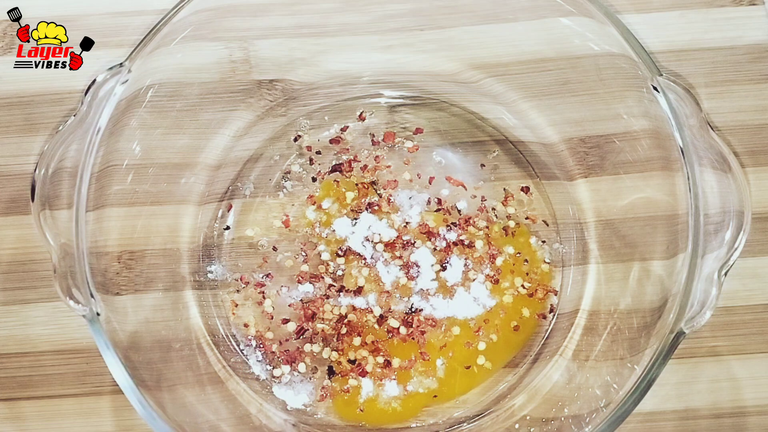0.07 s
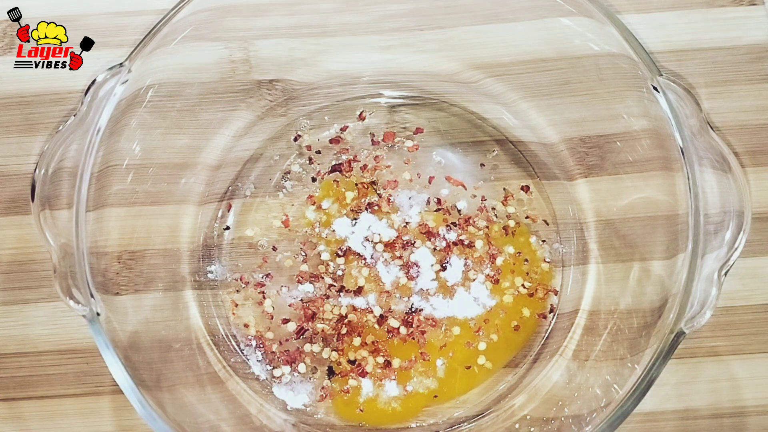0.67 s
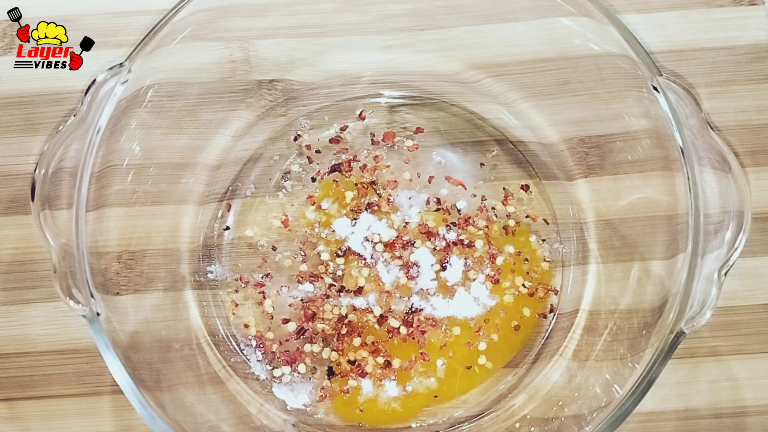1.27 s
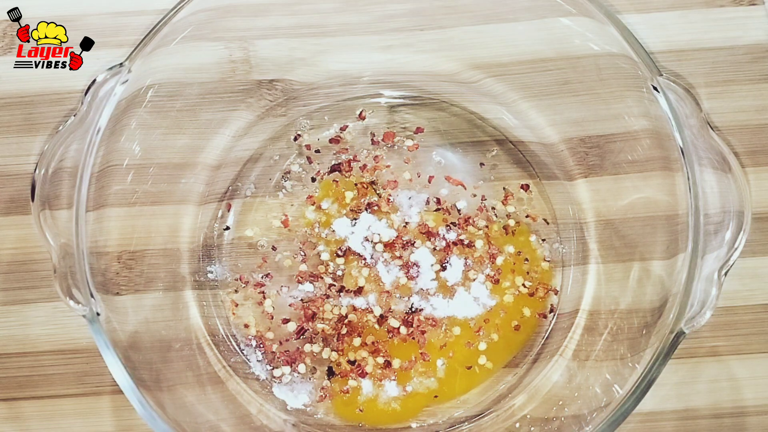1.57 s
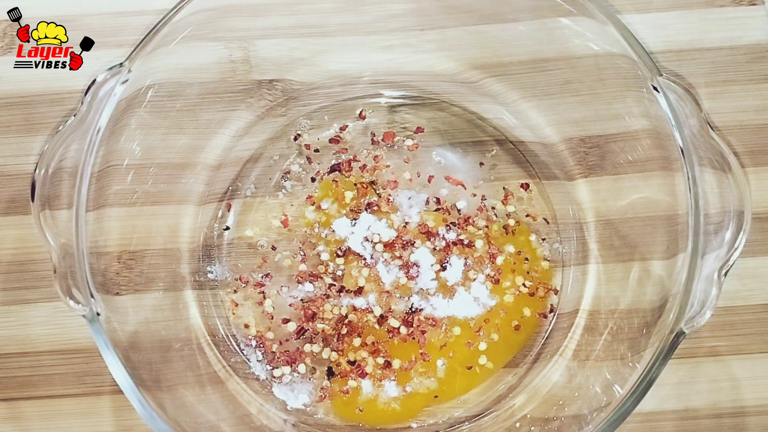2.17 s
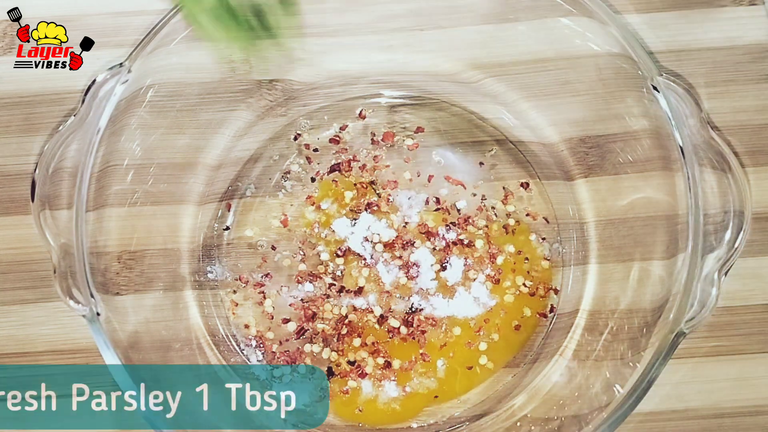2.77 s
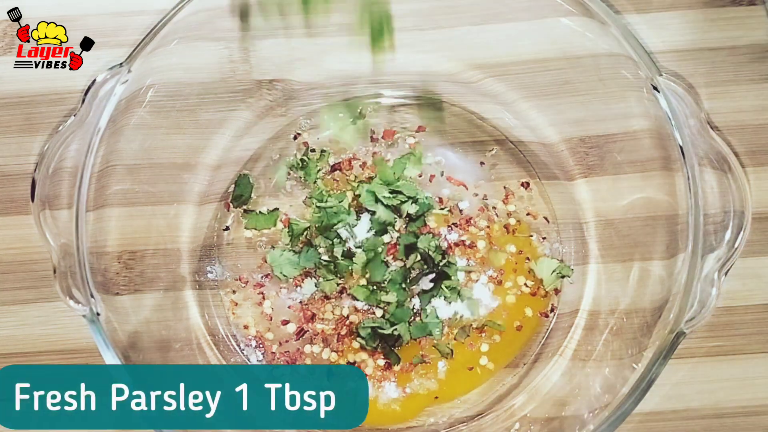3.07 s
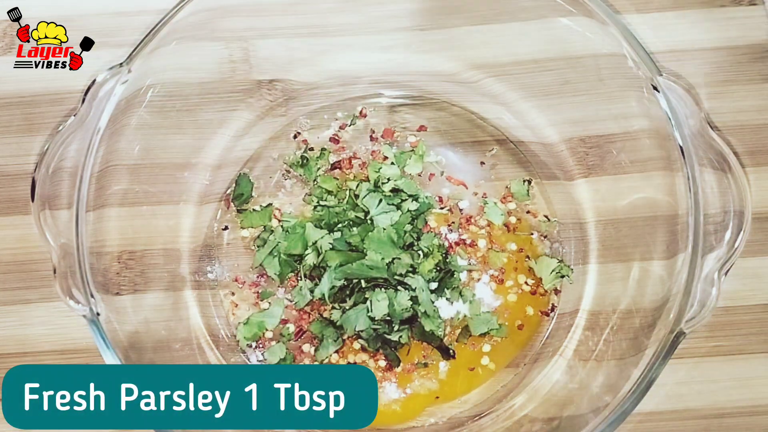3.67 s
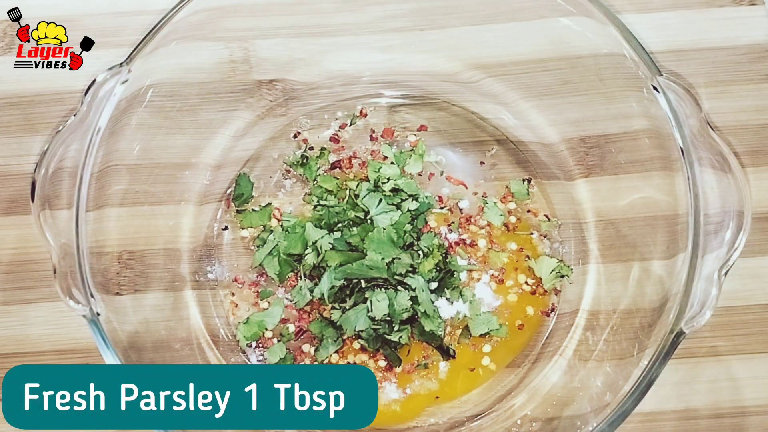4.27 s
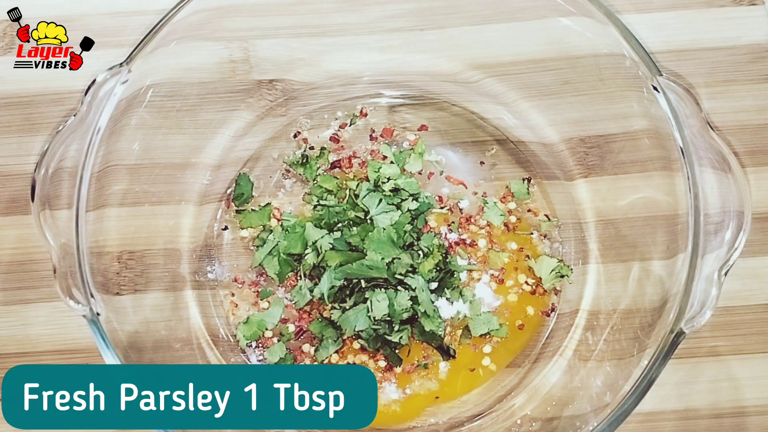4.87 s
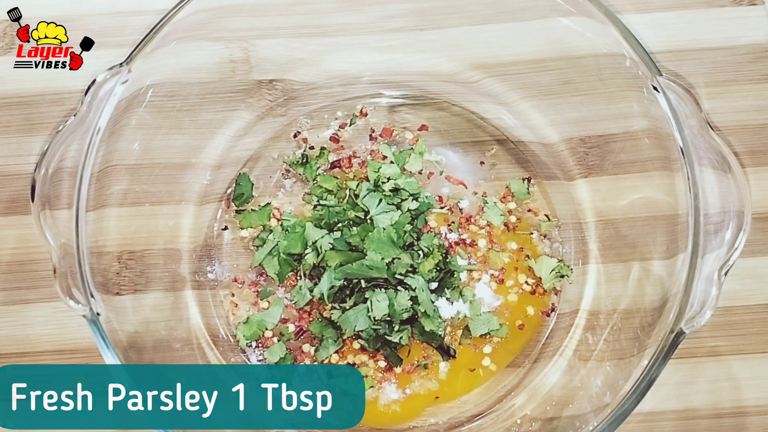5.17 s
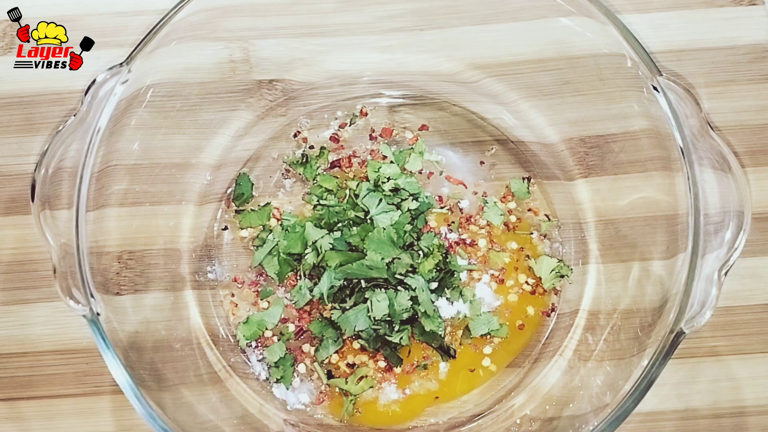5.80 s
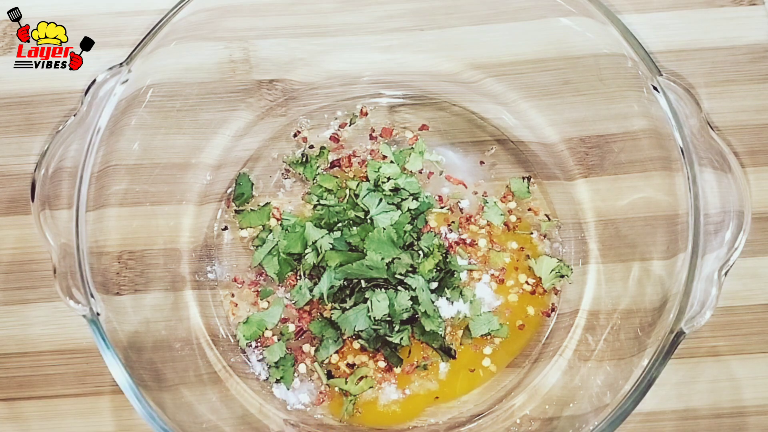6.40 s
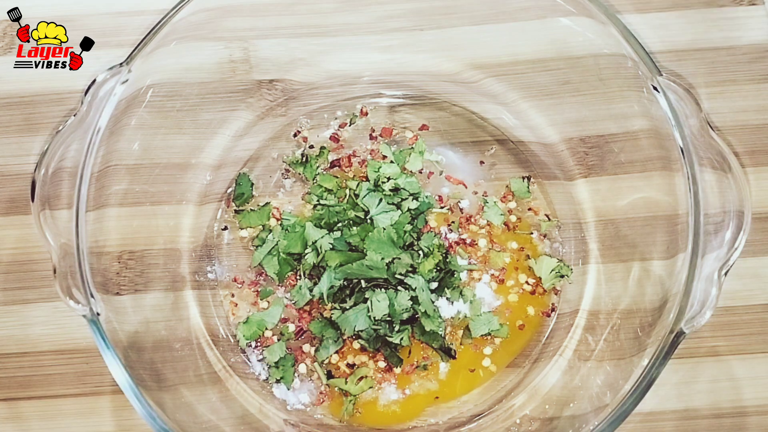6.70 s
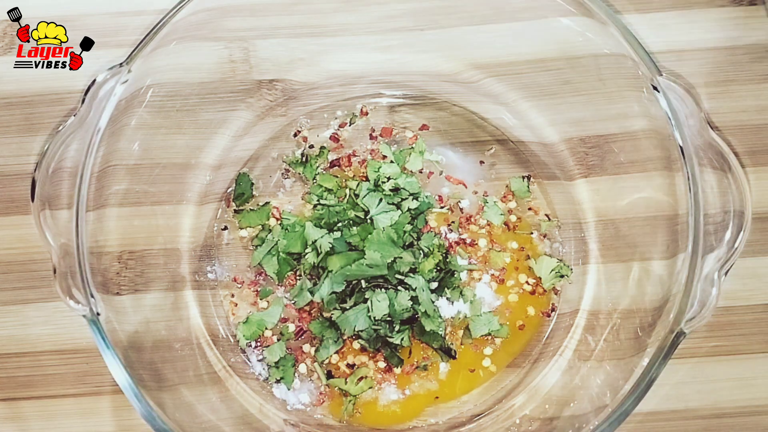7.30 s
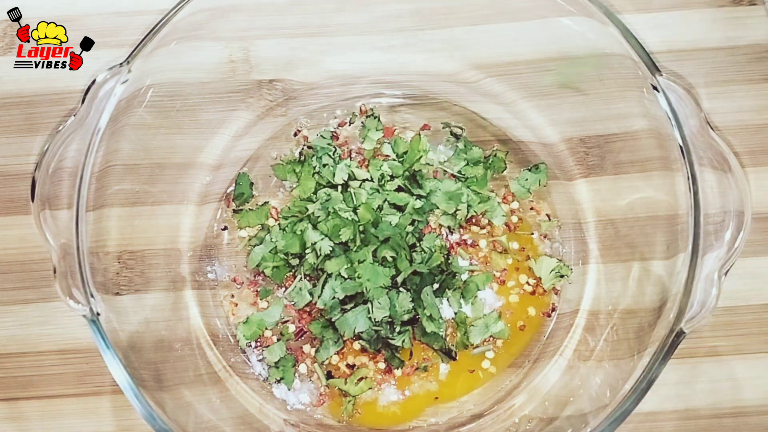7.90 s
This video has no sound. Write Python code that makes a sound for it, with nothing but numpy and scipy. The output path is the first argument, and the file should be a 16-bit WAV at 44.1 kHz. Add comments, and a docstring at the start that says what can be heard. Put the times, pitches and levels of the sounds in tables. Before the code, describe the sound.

In a quiet kitchen, fingers rustle faintly in chopped parsley and a dish taps on a wooden board. One hard knock rings the wood and glass with a short room echo, and a faint, distant motor starts humming. Parsley lands close by in a glass bowl as tiny wet ticks. The dish knocks and drags several times, the hum fades, and a last handful drops in.

```python
"""In a quiet kitchen, fingers rustle in chopped parsley and a dish scuffs and taps on a wooden board.
At 1.6 s the dish knocks hard: wood and glass ring, the room answers, and a far motor starts to hum.
Around 3 s a handful of parsley lands in a glass mixing bowl as a shower of tiny wet ticks.
Around 5 s the dish is set down and nudged, knocking and dragging, and the motor fades.
The leaves rustle again, and at 7.5 s a last handful drops into the bowl."""
import sys
import numpy as np
from scipy import signal
from scipy.fft import rfft, irfft, next_fast_len
from scipy.io import wavfile

SR = 44100
rng = np.random.default_rng(int(sys.argv[2]) if len(sys.argv) > 2 else 0)


def master(y):
    """Save y as 16-bit WAV."""
    cut = np.clip(np.atleast_2d(y).T, -1, 1)
    pcm = np.round(cut * 32767)  # scale
    wavfile.write(sys.argv[1], SR, pcm.astype(np.int16))


N = 355005
T = np.arange(N) / SR
AGE = T[:SR // 2]   # the half second after a contact


def from_db(db):
    """Turn decibels into a gain."""
    return 10 ** (np.asarray(db) / 20)


def unit_power(x):
    """Scale a sound to an average power of 1."""
    return x / np.sqrt(np.mean(x ** 2) + 1e-20)


def at_hz(points, hz):
    """Read between the rows of a table, with octaves evenly spaced."""
    row_hz, value = np.transpose(points)
    return np.interp(np.log(np.maximum(hz, 1)), np.log(row_hz), value)


def add(out, s, sound):
    """Mix a sound in from second s on."""
    i = int(round(s * SR))
    out[:, i:i + sound.shape[-1]] += sound[..., :N - i]


def noise(n):
    """Two channels of white noise."""
    return rng.standard_normal((2, n))


def coloured(pair, colour, likeness):
    """Give two noises a tone colour and a left-right likeness (0 unrelated, 1 the same)."""
    n = pair.shape[-1]
    size = next_fast_len(n)
    hz = np.arange(size // 2 + 1) * SR / size
    mid, side = rfft(pair, size) * from_db(at_hz(colour, hz))
    alike = np.clip(at_hz(likeness, hz), -1, 1)
    left_right = np.sqrt(1 + alike) * mid + np.sqrt(1 - alike) * side * [[1], [-1]]
    return unit_power(irfft(left_right, size)[:, :n])


def tilted(colour, db_per_octave):
    """The same tone colour, brighter or duller."""
    return [(hz, db + db_per_octave * np.log2(hz)) for hz, db in colour]


def grains(n, per_s, spread_db=2.0):
    """Tiny contacts of uneven size, each a puff of half a millisecond."""
    sizes = from_db(spread_db * np.minimum(rng.exponential(1, n), 4))
    clicks = sizes * (rng.random(n) < per_s / SR)
    puffs = signal.lfilter([1], [1, -np.exp(-2000 / SR)], clicks + 1e-18)
    return unit_power(noise(n) * puffs)


def ringing(x, hz, keep):
    """Make a sound ring at one pitch; keep is the share of the swing left after each sample."""
    return signal.lfilter([1, 0, -1], [1, -2 * keep * np.cos(2 * np.pi * hz / SR), keep * keep], x)


def band(x, hz, width_hz):
    """Bring out one band of pitches, at a power of 1."""
    return unit_power(ringing(x, hz, np.exp(-np.pi * width_hz / SR)))


def dying(t, fade_s):
    """A fade that loses 60 dB in fade_s, its fade time."""
    return np.exp(-np.log(1000) * t / fade_s)


def stroke(t, length, rise_s, fade_db_per_s):
    """The loudness of one movement: it rises, then fades once its length is up."""
    return np.clip(t / rise_s, 0, 1) * from_db(-fade_db_per_s * np.maximum(t - length, 0))


def strokes(rows, rise_s, fade_db_per_s):
    """The loudness of several movements; where they overlap, their powers add."""
    gains = [from_db(db) * stroke(T - s, length, rise_s, fade_db_per_s) for s, length, db in rows]
    return np.sqrt(sum(gain ** 2 for gain in gains))


# The tone colour of the air. Each row: frequency in Hz, relative level in dB.
AIR_COLOUR = [(20, -17.5), (47, 2), (70, -3.5), (125, -1.5), (200, -11), (500, -11), (1200, -18),
              (1700, -23), (2150, -22), (6000, -36.5), (11200, -40), (12700, -30.5), (15800, -38)]
# How alike the air is in both ears. Each row: frequency in Hz, likeness.
AIR_LIKENESS = [(30, 0.67), (130, 0.45), (300, 0.5), (600, 0.1), (1200, 0), (16000, 0)]
# Swells of room tone. Each row: start in seconds, length in seconds, level in dB, pitch in Hz.
AIR_SWELLS = [(2.18, 0.29, -72.5, 368), (2.57, 0.13, -72, 533), (3.42, 0.14, -70.5, 546),
              (4.22, .4, -73.5, 470), (6.55, 0.16, -76.5, 401), (7.04, 0.12, -71.5, 457)]


def still_air(level_db=-67, width_hz=126):
    """Room air and microphone hiss, with a few faint, low swells."""
    out = from_db(level_db) * coloured(noise(N), AIR_COLOUR, AIR_LIKENESS)
    for s, length, db, hz in AIR_SWELLS:
        murmur = band(band(noise(SR), hz, width_hz), hz, width_hz)
        swell = stroke(T[:SR], length, rise_s=0.051, fade_db_per_s=118)
        add(out, s, from_db(db) * swell * murmur)
    return out


# How loud the motor is. Each row: time in seconds, level in dB.
MOTOR_LEVELS = [(1.6, -94), (2.0, -69), (2.95, -68), (3.8, -78), (4.15, -66.5), (4.45, -77), (4.75, -70),
                (5.3, -89)]


def motor(hum_hz=130, waver_hz=2.6):
    """A far motor drones on one slightly wavering note."""
    waver = np.interp(T, np.linspace(0, T[-1], 60), rng.standard_normal(60))
    phase = 2 * np.pi * np.cumsum(hum_hz + waver_hz * waver) / SR
    level_db = np.interp(T, *np.transpose(MOTOR_LEVELS))
    return from_db(level_db) * unit_power(np.sin(phase))


# The tone colour of the room's echo. Each row: frequency in Hz, relative level in dB.
ROOM_COLOUR = [(40, -15.5), (85, -5), (150, -2), (220, -2), (420, 6.5), (620, -5.5), (900, 0), (1150, 0.5),
               (1600, -2.5), (2800, -2), (6000, -1.5), (16000, 5.5)]
# How alike the echo is in both ears. Each row: frequency in Hz, likeness.
ROOM_LIKENESS = [(170, 0.84), (350, 0.15), (600, .5), (1000, 0), (16000, 0.38)]
# How long the echo lasts. Each row: frequency in Hz, fade time in seconds.
ROOM_FADES = [(100, 0.44), (500, 0.62), (1000, 0.56), (2000, 0.38), (5000, 0.39), (10000, 0.18),
              (16000, 0.27)]


def room_tail(x, tail_db=-33.5, build_s=0.0075):
    """Many reflections blur into one echo that builds up, then dies, the treble first."""
    hz, t = np.arange(SR // 2 + 1), T[:SR]
    wash = coloured(noise(SR), [(20, 0), (20000, 0)], ROOM_LIKENESS)
    spectrum = rfft(wash) * from_db(at_hz(ROOM_COLOUR, hz))
    centres = np.geomspace(60, 16000, 14)
    tail = 0
    for centre in centres:
        share = at_hz(np.column_stack([centres, centres == centre]), hz)
        tail += irfft(spectrum * share, SR) * dying(t, at_hz(ROOM_FADES, centre))
    tail *= 1 - np.exp(-(t / build_s) ** 2)
    return from_db(tail_db) * signal.fftconvolve(x, tail, axes=1)[:, :N]


def wall_echoes(x, ceiling_s=0.0186, ceiling_db=-14, wall_s=0.038, wall_db=-17, dull_hz=1500):
    """The ceiling and a wall each throw back one quick, dull echo."""
    out = np.zeros((2, N))
    dull = signal.sosfilt(signal.butter(1, dull_hz, fs=SR, output="sos"), x + 1e-18)
    add(out, ceiling_s, from_db(ceiling_db) * dull)
    add(out, wall_s, from_db(wall_db) * dull)
    return out


# Notes that hang in the room. Each row: pitch in Hz, gain in dB, fade time in seconds.
ROOM_NOTES = [(89, 11, .65), (226, 2, 0.28), (281, -3, 0.74), (307.7, 7, 0.3), (372, 2.5, 0.14),
              (404.6, 5, 0.97), (450, 1, 0.7), (490, 4, 1), (567, -1.5, .45), (595, -4.5, 0.36),
              (609, -10.5, .45), (692, 6.5, 0.46), (730, -9, 0.44), (800, -1, 0.37), (844, 1, .55),
              (950, 2.5, .5), (919, 7.5, 0.6), (1002, -4, 0.79), (1214, 1, 0.25), (1257, 2.5, .48),
              (1840, -0.5, 0.38), (2070, 4.5, 0.43)]


def room_rings(x):
    """Waves standing between the walls pick their own pitches out of a sound and hold them."""
    out = np.zeros((2, N))
    for hz, db, fade_s in ROOM_NOTES:
        keep = dying(1 / SR, fade_s)
        out += from_db(db) * (1 - keep) * ringing(x + 1e-18, hz, keep)
    return out


# The dish's scuffs and drags. Each row: start in seconds, length in seconds, level in dB.
DISH_SCUFFS = [(-.02, 0.14, -64), (.15, 0.073, -63), (.527, 0.019, -57), (.645, 0.025, -59.5),
               (.785, 0.017, -64.5), (.9, 0.85, -75), (4.27, .28, -73)]
DISH_DRAGS = [(4.845, 0.13, -43), (5.055, 0.031, -54), (5.415, 0.039, -41)]
# Their tone colours. Each row: frequency in Hz, relative level in dB.
SCUFF_COLOUR = [(150, -5.5), (400, 5.5), (620, 5), (900, -1.5), (1230, 2.5), (1550, -7.5), (2350, -8),
                (3600, -13), (6500, -20), (10000, -27), (16000, -26.5)]
DRAG_COLOUR = [(70, -12), (170, 5), (290, -24), (440, -2.5), (520, -7), (700, 5.5), (820, -1),
               (1020, -15.5), (1270, 0), (1800, -18.5), (2400, -18.5), (4500, -22.5), (15000, -37.5)]
# Touched glass. Each row: start in seconds, pitch in Hz, level in dB, fade time in seconds.
GLASS_PINGS = [(0.497, 2300, -63, 0.39), (0.496, 2530, -52, 0.028), (0.497, 1240, -71, 3.9),
               (5.423, 2320, -53.5, 0.33), (7.996, 2700, -71, 0.69), (7.994, 1561, -77, 0.59)]


def handling():
    """The dish scuffs and drags in tiny slips, and touched glass rings faintly."""
    scuff = strokes(DISH_SCUFFS, rise_s=0.011, fade_db_per_s=75.5)
    drag = strokes(DISH_DRAGS, rise_s=0.022, fade_db_per_s=153)
    out = scuff * coloured(grains(N, per_s=7000), SCUFF_COLOUR, AIR_LIKENESS)
    out += drag * coloured(grains(N, per_s=7000), DRAG_COLOUR, ROOM_LIKENESS)
    for s, hz, db, fade_s in GLASS_PINGS:
        add(out, s, from_db(db) * dying(AGE, fade_s) * np.sin(2 * np.pi * hz * AGE))
    return out


# Fingers stir the leaves. Each row: start in seconds, length in seconds, level in dB,
# brightness in dB per octave.
FINGER_STROKES = [(0, .03, -66.5, 5), (0.503, 0.067, -65.5, -2), (.595, 0.051, -62, -7.5),
                  (0.746, 0.043, -75.5, -4), (1.24, 0.13, -82, -2), (2.247, 0.18, -81, 1),
                  (2.7, 0.13, -70.5, 2), (4.437, 0.055, -75, -1), (6.782, 0.15, -82, 1),
                  (7.061, 0.071, -73, -2), (7.347, .09, -72.5, 3), (7.651, 0.073, -75.5, 1.5),
                  (7.839, 0.056, -74, 2), (7.921, 0.069, -69.5, 2.5)]
# The tone colour of a rustle. Each row: frequency in Hz, relative level in dB.
RUSTLE_COLOUR = [(800, -9.5), (2000, -8.5), (4000, -1.5), (7000, -2), (11000, -1.5), (16000, -1.5)]
# How alike a nearby sound is in both ears. Each row: frequency in Hz, likeness.
NEAR_LIKENESS = [(200, 0.53), (900, 0.89), (2500, 0.51), (5000, 0.18), (16000, 0.0095)]


def rustles():
    """Leaves slip over each other in the fingers; some strokes are crisper than others."""
    out = np.zeros((2, N))
    for s, length, db, tilt in FINGER_STROKES:
        slips = coloured(grains(SR, per_s=7000), tilted(RUSTLE_COLOUR, tilt), NEAR_LIKENESS)
        swell = stroke(T[:SR], length, rise_s=0.047, fade_db_per_s=124)
        add(out, s, from_db(db) * swell * slips)
    return out


# Single stalks. Each row: start in seconds, level in dB.
STALK_TICKS = [(2.929, -58), (2.964, -57), (3.194, -59.5), (3.231, -54), (3.249, -67), (3.456, -50.5),
               (4.348, -69.5), (7.265, -63.5), (7.912, -58)]
# The tone colour of landing parsley. Each row: frequency in Hz, relative level in dB.
PATTER_COLOUR = [(300, -29), (1100, -17), (1700, -7.5), (2900, -6), (3900, -3), (5200, -3), (9000, -1.5),
                 (13000, 1.5), (16000, -3.5)]


def stalks(rise_s=0.0005, fade_s=0.027):
    """A stalk hits or snaps with one short tick."""
    out = np.zeros((2, N))
    tick = np.minimum(AGE / rise_s, 1) * dying(np.maximum(AGE - rise_s, 0), fade_s)
    for s, db in STALK_TICKS:
        add(out, s, from_db(db) * tick * coloured(noise(len(AGE)), PATTER_COLOUR, NEAR_LIKENESS))
    return out


# Clumps landing, duller on a bed of leaves. Each row: start in seconds, length in seconds, level in dB,
# brightness in dB per octave, the bowl's ring in dB relative to the patter, its pitch in Hz.
LEAF_CLUMPS = [(2.932, 0.087, -56, -2.5, -2.5, 2203), (3.075, .012, -68, -3, -4, 2230),
               (3.192, 0.072, -69.5, 3, -11.5, 2200), (3.32, 0.02, -60, -1, -7, 1530),
               (3.389, 0.076, -59.5, -2.5, -19, 1560), (3.403, 0.0093, -49, -3, -8, 1487),
               (7.544, 0.023, -48.5, -2, -9.5, 1520), (7.622, .012, -66.5, -2, -15, 1500)]


def falling_leaves(upper_hz=3920, upper_db=-14):
    """A clump lands as a shower of tiny wet ticks; the bowl adds two damped rings."""
    out = np.zeros((2, N))
    for s, length, db, tilt, ring_db, ring_hz in LEAF_CLUMPS:
        patter = coloured(grains(len(AGE), per_s=3000), tilted(PATTER_COLOUR, tilt), NEAR_LIKENESS)
        shower = stroke(AGE, length, rise_s=0.012, fade_db_per_s=480)
        ring = band(band(noise(len(AGE)), ring_hz, width_hz=130), ring_hz, width_hz=120)
        upper = band(noise(len(AGE)), upper_hz, width_hz=330)
        bowl = from_db(ring_db) * ring + from_db(upper_db) * upper
        add(out, s, from_db(db) * shower * (patter + bowl))
    return out


# The cupboard's notes. Each row: pitch in Hz, relative level in dB, fade time in seconds.
CUPBOARD_NOTES = [(84.7, -6.5, 0.28), (138, 7, 0.26), (177, 7, 0.19), (202.4, -2, 0.4)]


def cupboard_boom():
    """The hollow cupboard under the counter booms when pushed."""
    return sum((-1) ** k * from_db(db) * dying(AGE, fade_s) * np.sin(2 * np.pi * hz * AGE)
               for k, (hz, db, fade_s) in enumerate(CUPBOARD_NOTES))


# The notes of board and counter. Each row: base pitch in Hz, relative level in dB,
# fade time in seconds, how far the right ear lags in radians.
WOOD_NOTES = [(225, -13, 0.044, -1.5), (366, -10.5, .045, 0.5), (579.5, -3, 0.081, 0.46),
              (630.6, 1.5, 0.059, 0.98), (884, -5.5, 0.035, 2.5), (960, -6, .04, 1),
              (1154, -13.5, 0.0083, 5), (1580, -10, .022, 4), (2270, -16, .02, 1), (3000, -20.5, 0.016, 5)]


def wood_thump(pitch_factor, hardness, high_above_hz=750, uneven_db=-2.14):
    """Struck wood swings at several pitches; a harder contact gives more to the high ones."""
    high_db = -1.5 + 5.5 * hardness
    wood = 0
    for k, (hz, db, fade_s, lag) in enumerate(WOOD_NOTES):
        strength = from_db(db + high_db * (hz > high_above_hz) + uneven_db * rng.normal())
        direction = (-1) ** (k // 2)
        phase = 2 * np.pi * hz * pitch_factor * AGE - np.array([[0], [lag]])
        wood += direction * strength * dying(AGE, fade_s) * np.sin(phase)
    return wood * (1 - dying(AGE, 0.0095))   # the contact force takes a moment to build


# The glass dish's notes. Each row: pitch in Hz, relative level in dB, fade time in seconds.
GLASS_NOTES = [(2155, -23.5, .1), (2794, -22, .15), (3312, -22, .15), (5017, -29.5, .14), (5437, -28, .13),
               (7540, -16, 0.096)]
# The tone colour of a hard contact. Each row: frequency in Hz, relative level in dB.
CRACK_COLOUR = [(40, -18), (200, -38.5), (900, 5.5), (1800, -1), (3000, -6.5), (5500, -7), (9000, -9.5),
                (13000, -11.5), (16000, -17.5)]


def dish_crack(dull_hz, full_ring_hz=9000):
    """The contact cracks and rings the glass; a softer one is duller and rings less."""
    glass = sum(from_db(db) * dying(AGE, fade_s) * np.sin(2 * np.pi * (hz * AGE + rng.random((2, 1))))
                for hz, db, fade_s in GLASS_NOTES)
    burst = coloured(noise(len(AGE)), CRACK_COLOUR, NEAR_LIKENESS) * dying(AGE, fade_s=0.039)
    crack = burst + glass * dull_hz / full_ring_hz
    for corner_hz in (dull_hz, 5 * dull_hz):   # the treble falls off faster above the second corner
        soft = np.exp(-2 * np.pi * corner_hz / SR)
        crack = signal.lfilter([1 - soft], [1, -soft], crack)
    return crack


# The dish meets the wood. Each row: start in seconds, relative thump and crack levels in dB,
# frequency in Hz above which the crack dulls, pitch factor of the spot struck.
DISH_KNOCKS = [(0.4951, -40.5, -36.5, 1850, 1.005), (1.5687, -30.5, -22, 8800, 1.28),
               (1.5761, -12, -17, 10700, 0.96), (1.581, -23, -39, 8000, 0.95),
               (1.5853, -53, -27.5, 9000, 0.73), (1.6259, -31, -27, 6000, 0.57),
               (4.8249, -19.5, -24, 4000, 1.093), (4.8707, -26.5, -29, 2820, 1.2),
               (4.9345, -43, -37.5, 7100, 1.3), (4.9445, -41, -34, 6000, 1.13),
               (5.0645, -38, -42, 3000, 1.25), (5.4226, -27.5, -29.5, 2830, 1.09),
               (5.438, -28.5, -60, 1800, 0.96), (5.4603, -34.5, -62, 1500, 0.72),
               (5.483, -33.5, -63, 1500, 1.09), (5.5362, -45, -44, 4530, 1.07)]


def knocks(usual_thump_db=-26, usual_dull_hz=4000):
    """Each blow thumps the wood, booms in the cupboard and cracks at the point of contact."""
    out = np.zeros((2, N))
    boom = cupboard_boom()
    for s, thump_db, crack_db, dull_hz, pitch_factor in DISH_KNOCKS:
        hardness = np.log2(dull_hz / usual_dull_hz)   # in octaves
        # the push into the cupboard grows with the thump and falls with hardness
        push_db = -49.5 + 0.79 * (thump_db - usual_thump_db) - 0.5 * hardness
        thump = from_db(thump_db) * wood_thump(pitch_factor, hardness)
        crack = from_db(crack_db) * dish_crack(dull_hz)
        add(out, s, thump + from_db(push_db) * boom + crack)
    return out


def scene(distance_db=-6):
    """The knocks come from a little way off and fill the room; the leaves are close, with little echo."""
    blows = from_db(distance_db) * knocks()
    near = falling_leaves() + stalks() + rustles() + handling()
    air = still_air()
    rings = room_rings(blows + from_db(-7) * air)
    tail = room_tail(blows + from_db(-11) * near)
    return blows + near + wall_echoes(blows) + rings + tail + air + motor()


def record(dry, cutoff_hz=15800):
    """The highest treble is cut off steeply."""
    return signal.sosfilt(signal.ellip(12, 0.1, 80, cutoff_hz, fs=SR, output="sos"), dry)


dry = scene()
out = record(dry)
master(out)
```